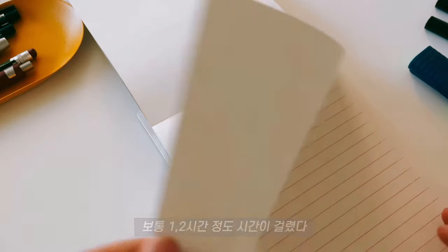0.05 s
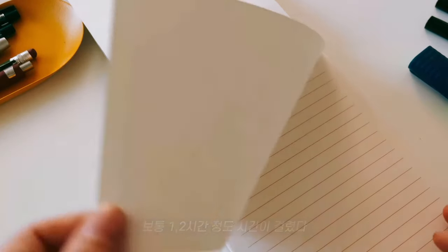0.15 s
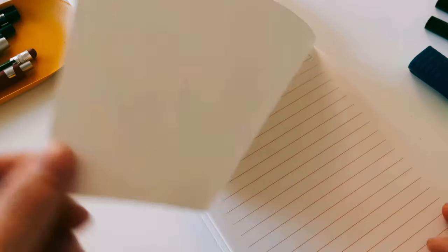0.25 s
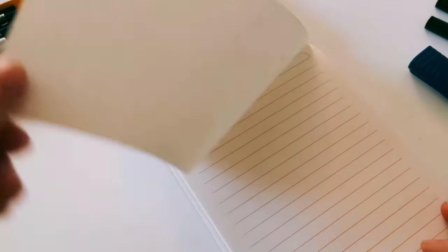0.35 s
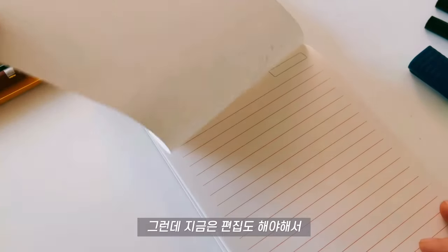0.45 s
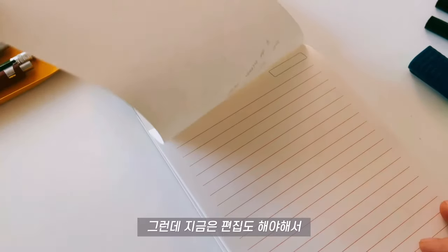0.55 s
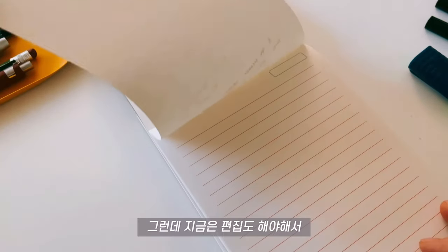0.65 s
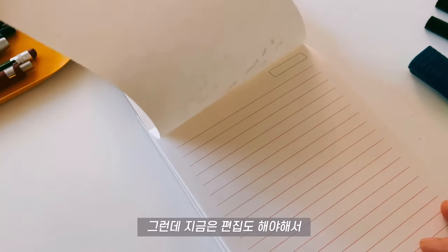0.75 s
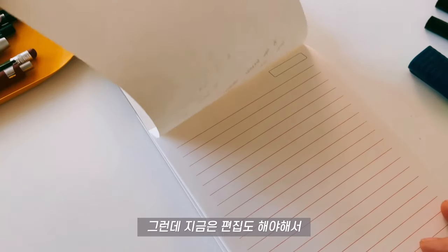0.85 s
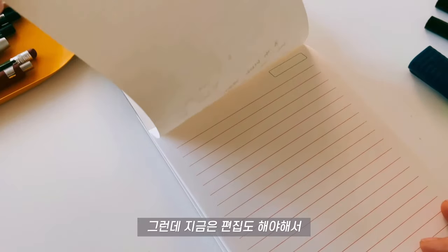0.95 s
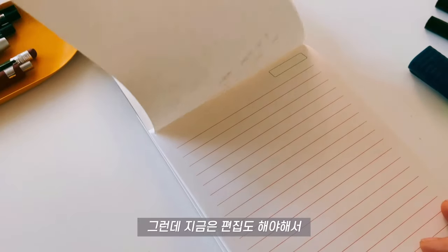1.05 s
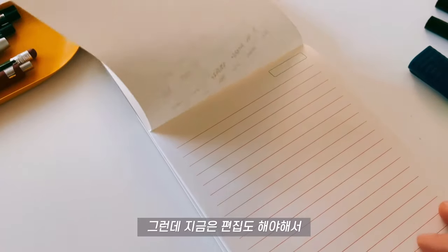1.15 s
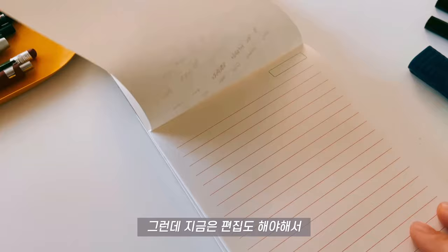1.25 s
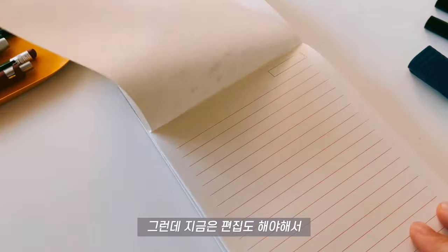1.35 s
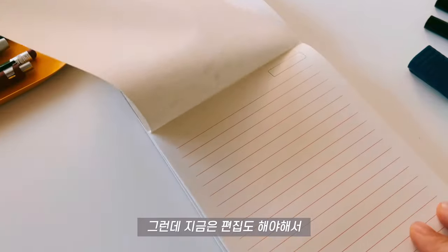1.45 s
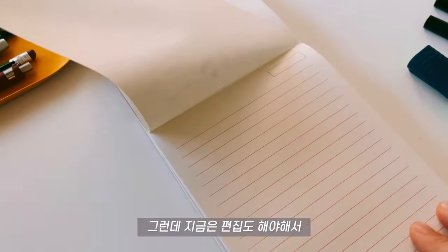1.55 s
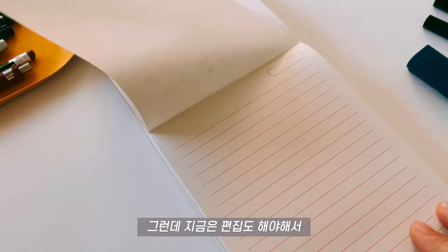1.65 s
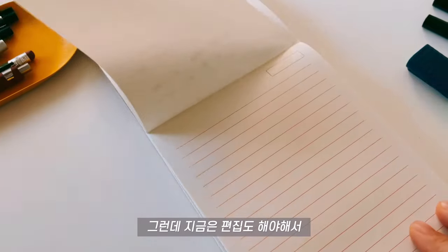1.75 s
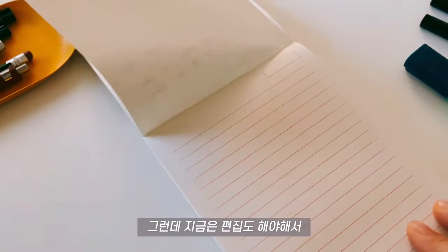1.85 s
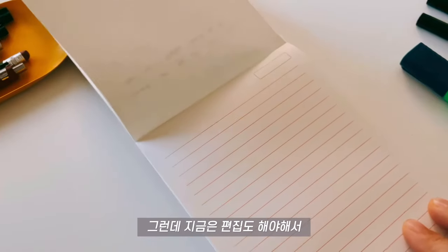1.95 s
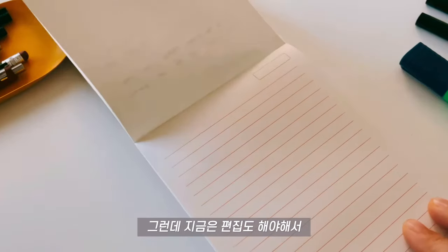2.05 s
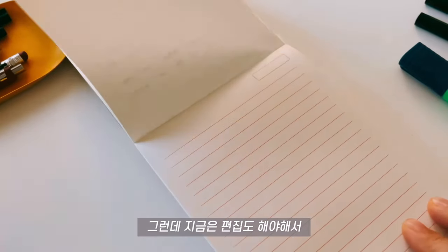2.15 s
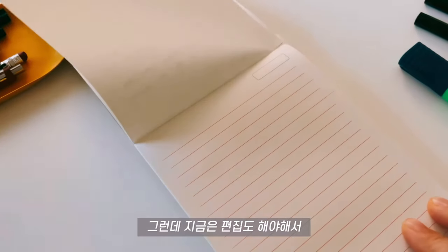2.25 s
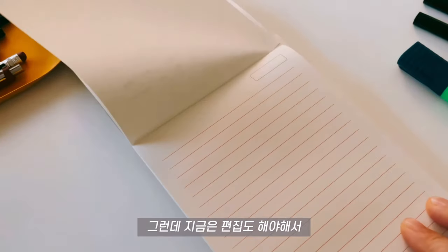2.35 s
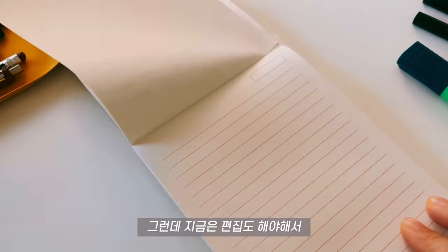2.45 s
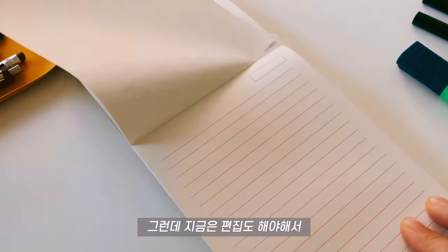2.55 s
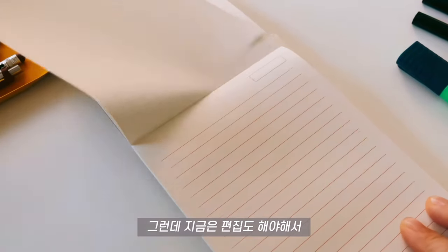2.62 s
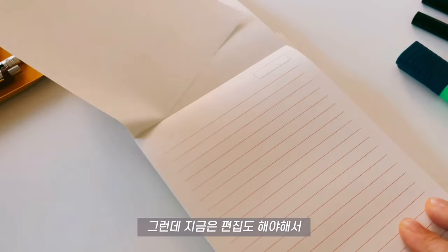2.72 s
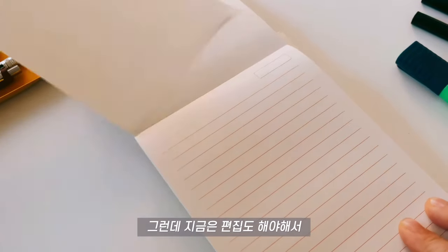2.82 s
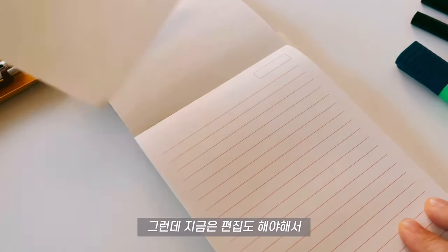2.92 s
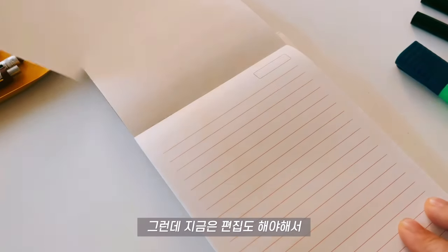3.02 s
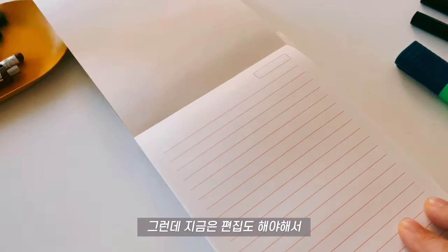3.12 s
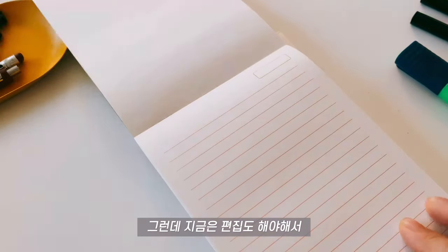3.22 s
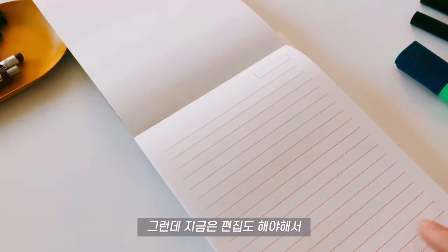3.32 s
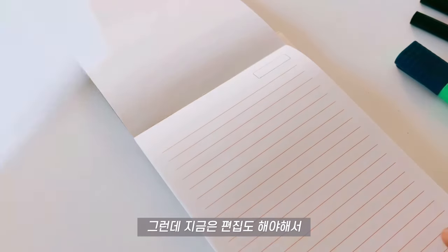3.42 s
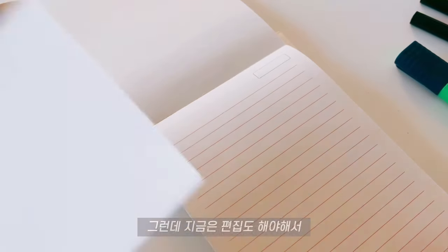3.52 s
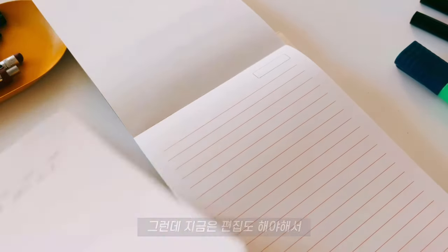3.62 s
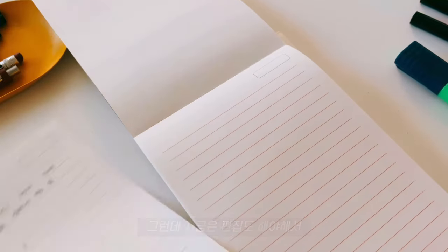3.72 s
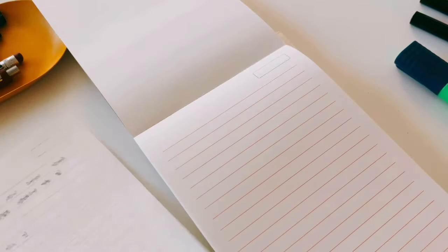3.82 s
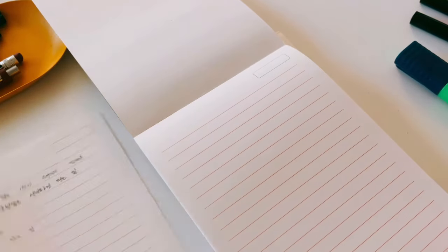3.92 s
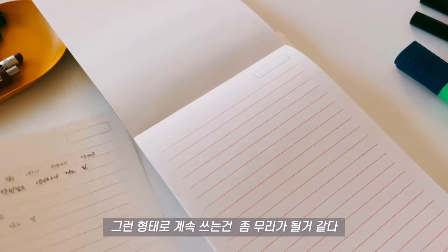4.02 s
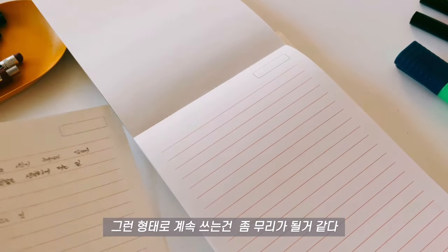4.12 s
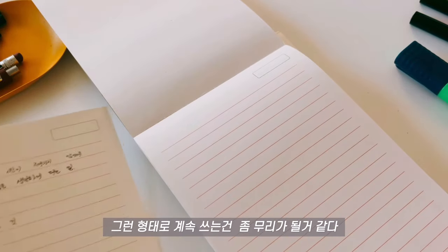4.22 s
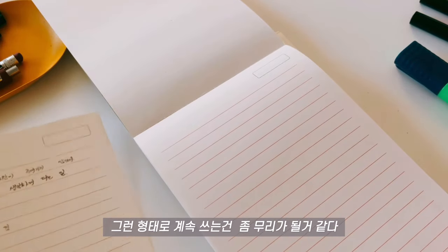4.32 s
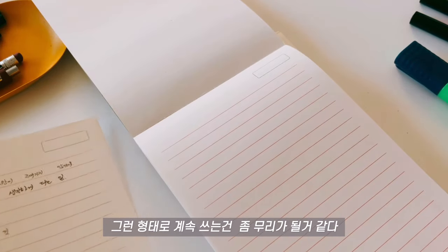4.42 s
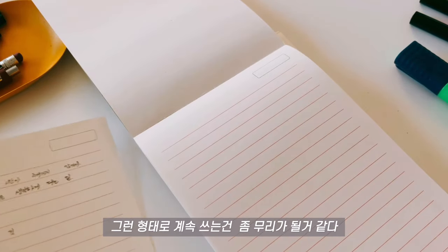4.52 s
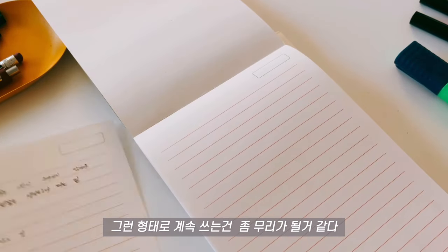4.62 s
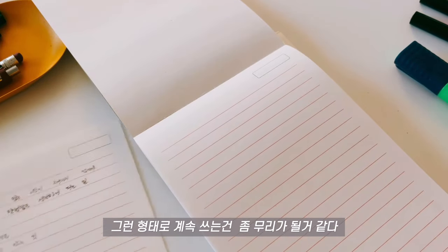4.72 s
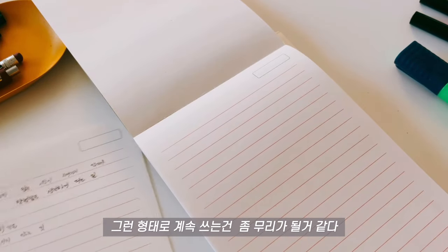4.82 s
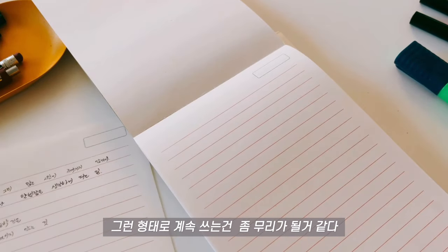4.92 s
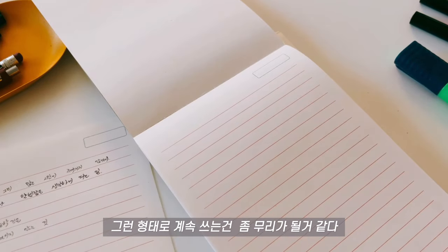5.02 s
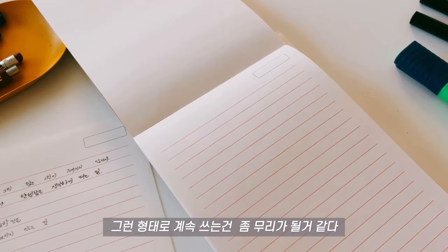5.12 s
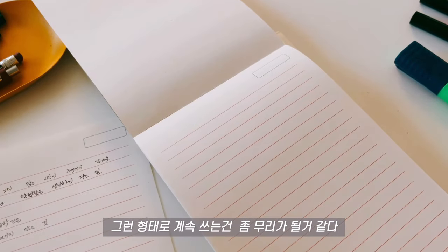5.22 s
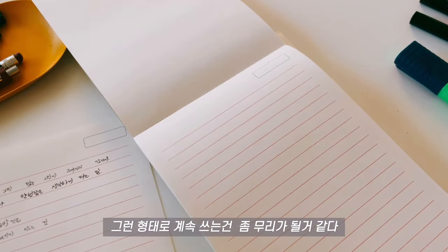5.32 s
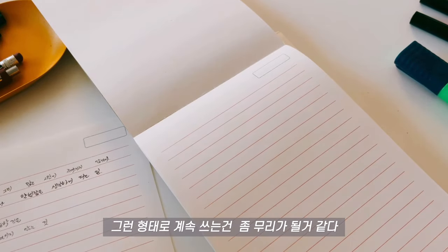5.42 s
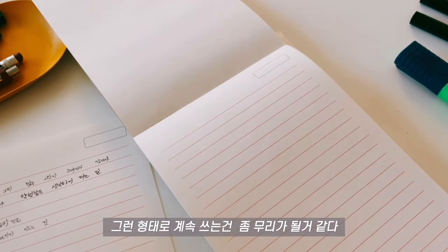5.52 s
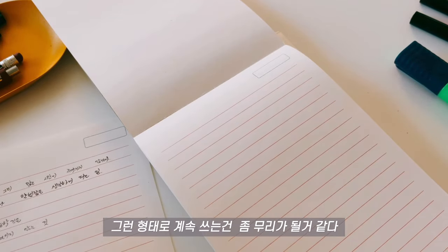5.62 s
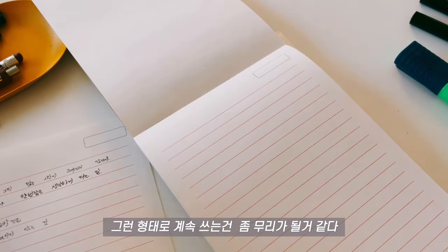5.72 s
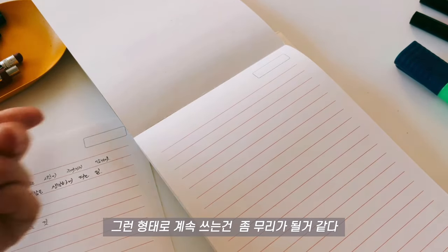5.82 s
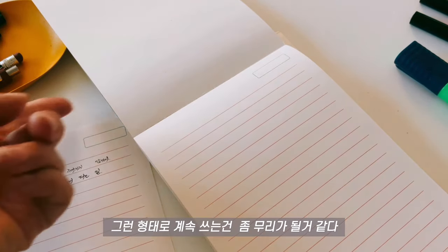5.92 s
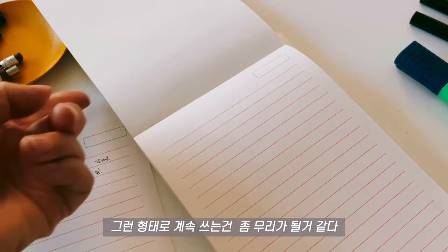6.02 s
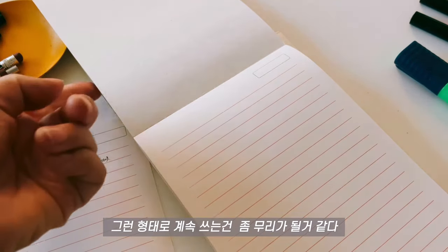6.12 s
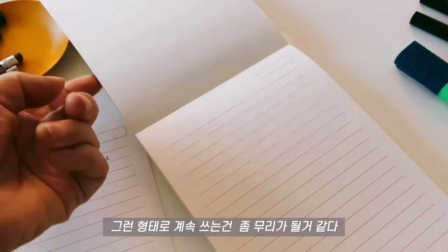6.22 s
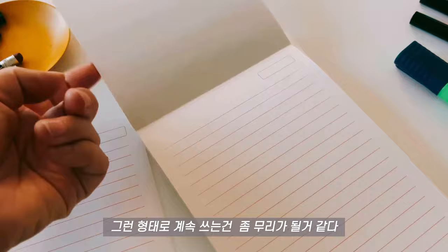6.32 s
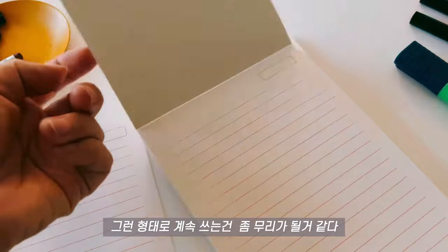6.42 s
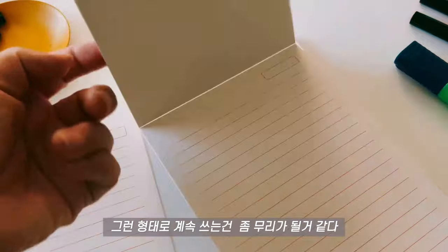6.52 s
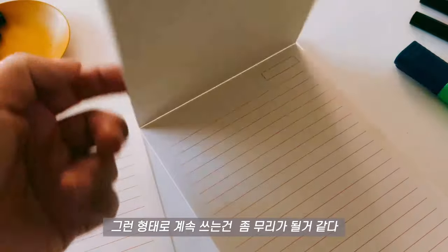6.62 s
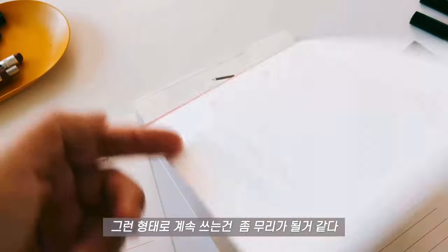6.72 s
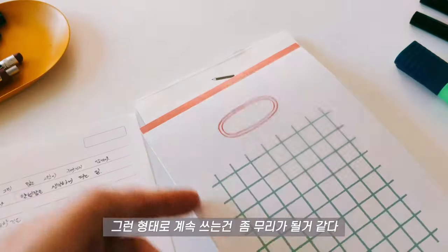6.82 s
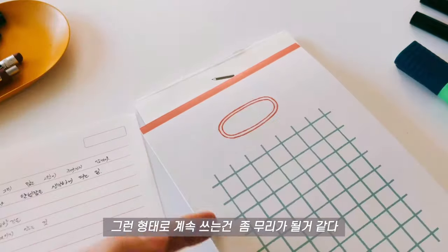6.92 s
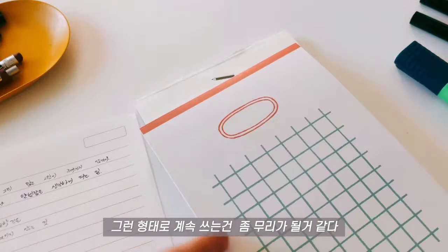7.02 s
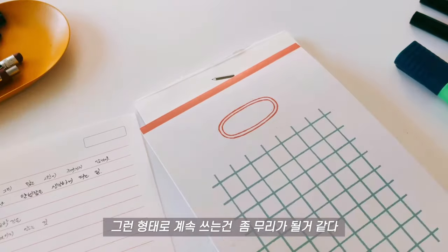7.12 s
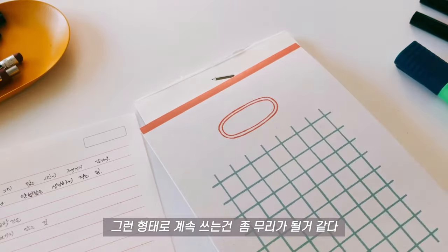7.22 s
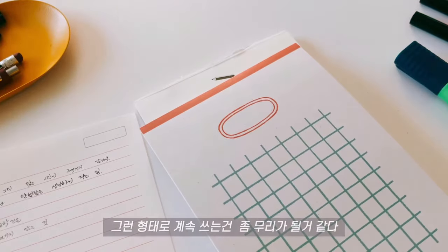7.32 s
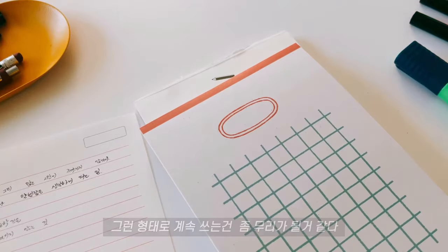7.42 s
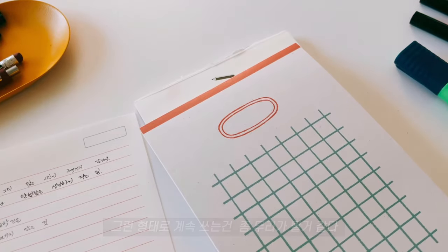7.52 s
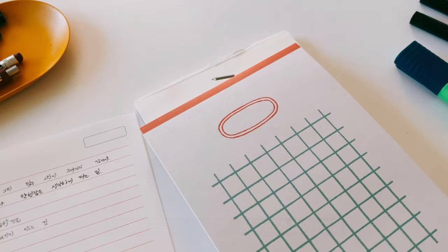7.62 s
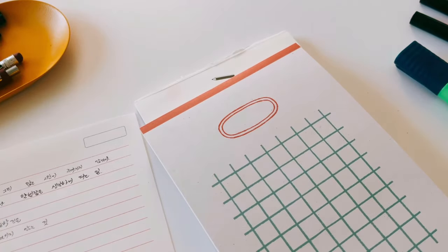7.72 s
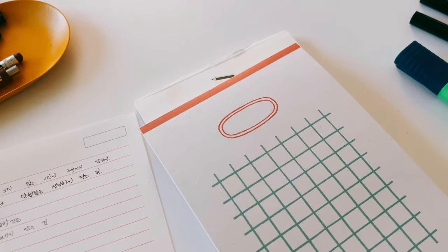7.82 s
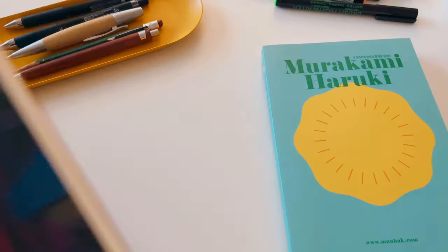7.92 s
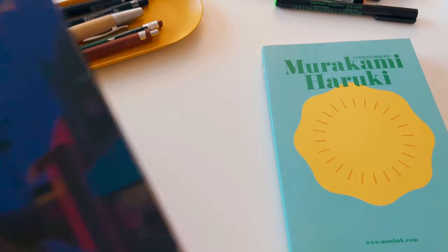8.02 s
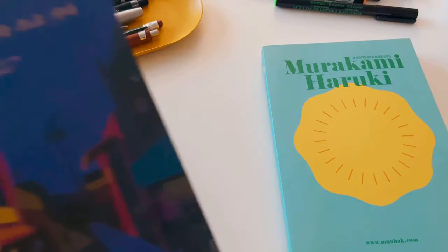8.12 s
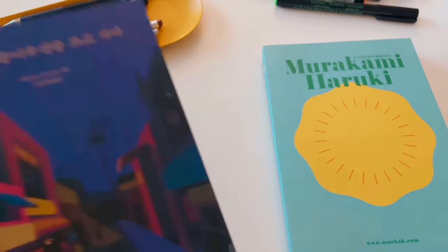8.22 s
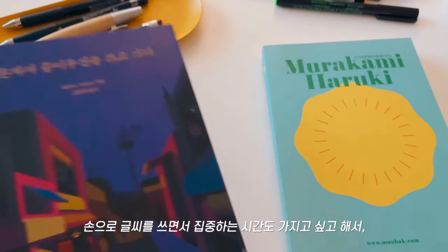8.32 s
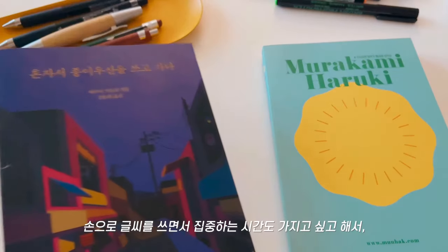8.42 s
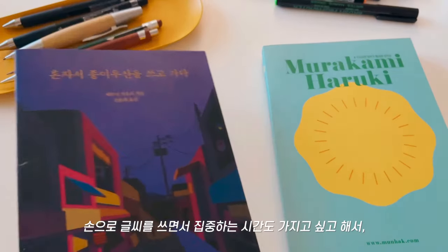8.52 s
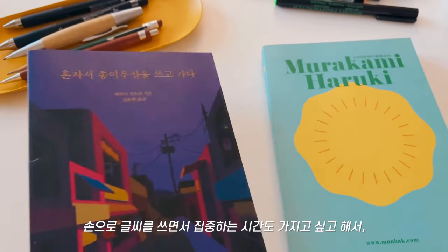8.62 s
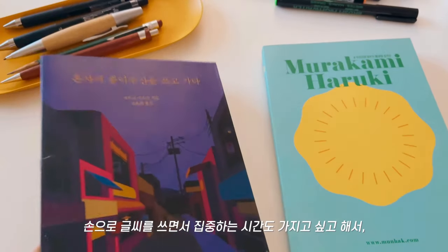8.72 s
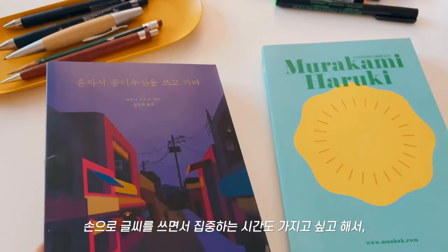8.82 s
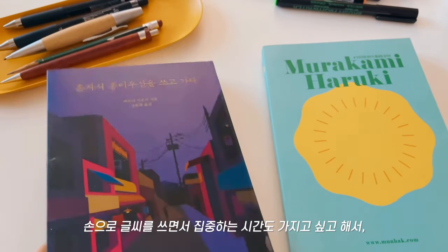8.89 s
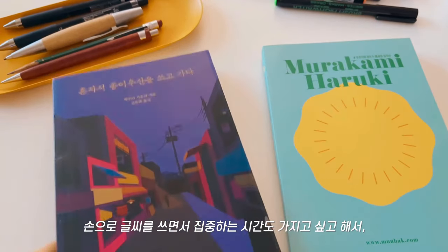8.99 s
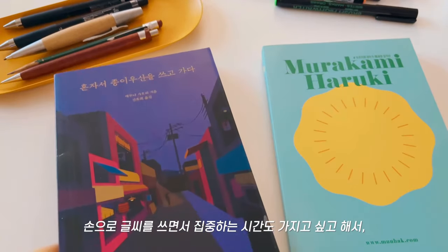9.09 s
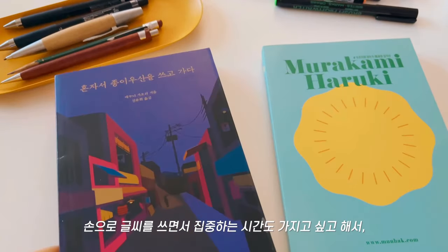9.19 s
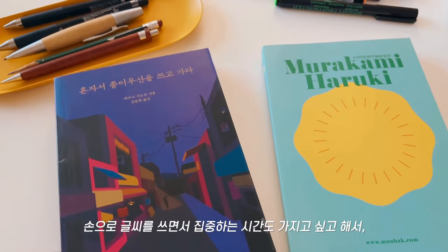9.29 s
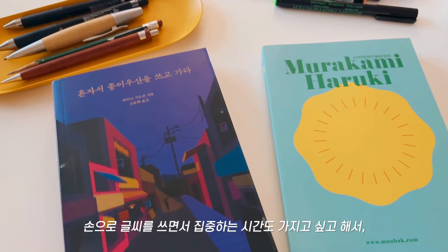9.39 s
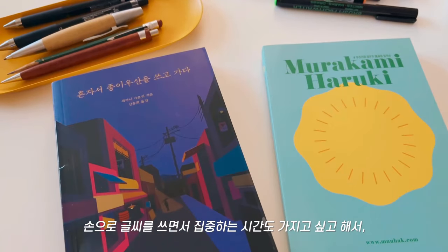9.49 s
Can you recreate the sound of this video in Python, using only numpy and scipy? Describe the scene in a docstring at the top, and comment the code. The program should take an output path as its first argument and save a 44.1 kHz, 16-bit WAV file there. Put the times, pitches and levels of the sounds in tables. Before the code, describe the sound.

Close up, paper is rubbed and snaps sharply, a sheet rips off a glued pad and slides aside, then a book lands softly.

```python
"""Hands work a paper notepad on a desk in a quiet room, heard close up over a low rumble and hum.
A page is smoothed back in short rubs (trains of tiny slips) and snaps as it buckles (noise cracks).
It is ripped off its glued edge (clumped slips, a drumming sheet) and slid aside; the cover is closed.
After a brief silence a book is pushed into place and set down (slips, clusters of damped modes)."""
import sys
import numpy as np
from scipy import signal
from scipy.io import wavfile
from scipy.ndimage import uniform_filter1d, map_coordinates

SR = 44100
rng = np.random.default_rng(int(sys.argv[2]) if len(sys.argv) > 2 else 0)


def master(y):
    """Save y as 16-bit WAV."""
    cut = np.clip(np.atleast_2d(y).T, -1, 1)
    pcm = np.round(cut * 32767)  # scale
    wavfile.write(sys.argv[1], SR, pcm.astype(np.int16))


N = 421155
TIME = np.arange(N) / SR


def gain_of(db):
    """Decibels to amplitude."""
    return 10 ** (np.asarray(db) / 20)


def evened(x):
    """Scales to rms 1."""
    return x / np.sqrt(np.mean(x ** 2) + 1e-20)


def read(points, hz):
    """Reads a spectrum on a log-frequency axis."""
    f, value = np.transpose(points)
    return np.interp(np.log(hz + 1), np.log(f + 1), value)


def add(mix, start_s, sound):
    """Mixes a sound in at start_s."""
    part = mix[max(round(start_s * SR), 0):][:len(sound)]
    part += sound[:len(part)]


def hump(hz, centre_hz, octaves):
    """A bell of height 1 on a log-frequency axis."""
    return np.exp(-(np.log2((hz + 1) / centre_hz) / octaves) ** 2)


def decay(t, t60_s):
    """Exponential fall by 60 dB in t60_s."""
    return np.exp(-np.log(1000) * t / t60_s)


def colour(x, db_at, size=4096):
    """Causal minimum-phase filter whose gain in dB is db_at(hz)."""
    hz = abs(np.fft.fftfreq(size, 1 / SR))
    log_gain = np.log(gain_of(db_at(hz)))
    taps = np.fft.ifft(np.exp(np.conj(signal.hilbert(log_gain)))).real
    return signal.oaconvolve(x, taps[:size // 2])[:len(x)]


def wander(length, per_s):
    """Smooth random curve of rms near 1 through per_s random points a second."""
    turns = np.arange(length) * per_s / SR
    coarse = np.linspace(0, turns[-1], 2048)
    points = rng.standard_normal(size=512)
    return np.interp(turns, coarse, map_coordinates(points, [coarse], order=2, mode="wrap"))


def slips(length, per_s, spread_db):
    """Tiny clicks at random moments, mostly small, a few large; rms 1."""
    size = gain_of(spread_db * np.minimum(rng.exponential(1, length), 4))
    sign = rng.choice([-1, 1], length)
    return evened(size * sign * (rng.random(length) < per_s / SR))


def paper(hz, tilt_db, centre_hz, height_db):
    """A sheet's colour in dB: plain spectrum, tilt per octave held below 450 Hz, one broad resonance."""
    # plain sheet: hz, density_db_per_hz
    plain_sheet = [(30, -21), (120, -5.5), (350, -3.5), (1000, 0), (3000, 1), (7400, -2), (9000, -7),
                   (11200, -1), (13300, -4.5), (15000, -14.5)]
    octave = np.log2(np.maximum(hz, 450) / 3000)
    return read(plain_sheet, hz) + tilt_db * octave + height_db * hump(hz, centre_hz, octaves=0.56)


def flex(x, db_at, depth_db, spacing_hz, per_s):
    """Colours x by db_at(hz, s), with small resonances that come and go as the sheet bends."""
    hz, t, z = signal.stft(x, SR, nperseg=256)
    hz, t = np.meshgrid(hz, t, indexing="ij")
    grid = rng.standard_normal((64, 64))
    patches = map_coordinates(grid, [hz / spacing_hz, t * per_s], order=2, mode="wrap")
    return signal.istft(z * gain_of(db_at(hz, t) + depth_db * patches), SR, nperseg=256)[1][:len(x)]


def stroke(length_s, edges, swell_db, db_at):
    """Fibres catch and slip thousands of times a second while the paper speeds up, travels and stops."""
    u = np.arange(int(length_s * SR)) / SR / length_s
    ramp = np.clip(np.minimum(u / edges[0], (1 - u) / edges[1]), 0, 1)
    speed = np.sin(np.pi / 2 * ramp) ** 1.1
    grip = slips(len(u), per_s=9000, spread_db=2.0) * gain_of(1.0 * wander(len(u), per_s=67))
    rubbing = evened(flex(grip, db_at, depth_db=3.5, spacing_hz=420.6, per_s=20.3))
    return speed * gain_of(swell_db * (u - .5)) * rubbing


def crack(t60_s, tilt_db, centre_hz, height_db):
    """One hard crack, then a crackle that the paper damps; normalised to rms 1 over 10 ms."""
    t = np.arange(4096) / SR
    force = decay(t, t60_s) + 0.73 * np.exp(-(t / .0007) ** 2)
    onset = 1 - np.exp(-t / (0.047 * t60_s))
    burst = rng.standard_normal(len(t)) * force * onset
    burst = colour(burst, lambda hz: paper(hz, tilt_db, centre_hz, height_db))
    return burst * np.sqrt(SR / 100) / np.linalg.norm(burst)


def blow(centre_hz, t60_s):
    """A soft push or blow sounds as a cluster of well-damped modes around centre_hz."""
    place, t = np.linspace(-2, 2, 24), np.arange(int(t60_s * SR)) / SR
    hz = centre_hz * 2 ** (0.75 * (place + rng.uniform(-.08, .08, len(place))))
    phase_turns = rng.random((len(hz), 1))
    modes = np.exp(-place ** 2 / 1.7) @ np.sin(2 * np.pi * (hz[:, None] * t + phase_turns))
    ring = modes * (1 - np.exp(-t / .006)) * decay(t, t60_s)
    return evened(ring) * np.sqrt(.08)  # the level holds for the loud first part


def room_tone():
    """Low wandering building rumble, a wavering mains hum that follows its level, a faint even hiss."""
    # air spectrum: hz, density_db_per_hz
    air_spectrum = [(15, -22.5), (30, -4.5), (65, 3.5), (110, -2.5), (160, -5.5), (230, -9.5), (320, -19.5),
                    (480, -27), (1000, -30), (1400, -34), (1700, -30.5), (2200, -39.5), (6000, -46.5),
                    (15000, -51.5)]
    # rumble level before its wander: time_s, level_db
    rumble_level = [(0, -65), (1.0, -67), (1.25, -59.5), (4.2, -59.5), (5.5, -62), (7.3, -60.5),
                    (7.9, -63.5), (9.55, -66)]
    hum_hz, hum_db, hum_db_per_rumble_db = 120.1, -63.5, 1.7  # hum_db goes with a rumble of -60 dB
    rumble_db = np.interp(TIME, *np.transpose(rumble_level))
    hum_level_db = hum_db + hum_db_per_rumble_db * (rumble_db + 60)
    air = evened(colour(rng.standard_normal(N), lambda hz: read(air_spectrum, hz), size=16384))
    rumble = signal.sosfiltfilt(signal.butter(2, 300, fs=SR, output="sos"), air)
    hiss = air - rumble
    hum = np.sqrt(2) * np.sin(2 * np.pi * hum_hz * TIME + .45 * wander(N, per_s=3.7))
    hum = hum * gain_of(1.5 * wander(N, per_s=7))
    rumble = gain_of(rumble_db + 2.0 * wander(N, per_s=9)) * rumble
    return rumble + gain_of(-60.5) * hiss + gain_of(hum_level_db) * hum


def room(x):
    """The small room's echo: a dense tail in which each band dies at its own speed."""
    # decay: hz, t60_s
    band_decay = [(150, 0.78), (600, 0.29), (2500, 0.31), (6000, 0.37), (14000, 0.38)]
    # echo strength: hz, level_db
    echo_strength = [(200, -5.5), (700, -11), (1800, -8), (4000, -11), (13000, -20)]
    taps = rng.standard_normal(SR // 2) * np.clip((TIME[:SR // 2] - .003) / 0.0035, 0, 1)
    hz, t, z = signal.stft(taps, SR, nperseg=256)
    z = z * decay(t, read(band_decay, hz)[:, None])
    z = z * gain_of(read(echo_strength, hz))[:, None]
    tail = signal.istft(z, SR, nperseg=256)[1] / np.sqrt(SR * 0.031)
    return signal.fftconvolve(x, tail)[:N]


def desk(x):
    """A slightly dulled bounce off the desk follows the direct sound and combs its spectrum."""
    delay_s, share, dull_hz = 0.0011063, 0.089, 4500
    bounce = colour(x, lambda hz: -10 * np.log10(1 + (hz / dull_hz) ** 2), size=128)
    return (x + share * np.interp(TIME - delay_s, TIME, bounce)) / np.sqrt(1 + share ** 2 / 2)


def thuds():
    """Low thuds: a hand or the book weighs on the desk, or a moving sheet or cover pushes air in a whoosh."""
    # thuds: start_s, level_db
    thud_events = [(1.816, -46.5), (1.907, -49), (2.659, -43.5), (6.9, -56.5), (7.377, -53.5),
                   (7.973, -47.5), (9.441, -47)]
    out = np.zeros(N)
    for start_s, level_db in thud_events:
        add(out, start_s, gain_of(level_db) * blow(centre_hz=79.9, t60_s=0.21))
    return out


def knocks():
    """Soft blows of sheet, finger or book on pad and desk, each with a dull scuff; low ones ring longer."""
    # blows: start_s, level_db, centre_hz
    knock_events = [(1.425, -52, 347), (1.459, -37, 782.7), (1.468, -48, 210), (2.136, -51, 399),
                    (2.153, -43, 367), (2.866, -41, 462), (3.174, -47.5, 376), (3.354, -53, 369),
                    (3.647, -50, 416), (3.686, -59, 399.4), (6.895, -62.5, 450), (7.144, -62, 500),
                    (8.365, -54, 334), (8.759, -54, 330.4), (8.895, -56, 332), (8.967, -53.5, 279),
                    (9.414, -58, 260), (9.44, -58, 337)]
    t60_at_400_hz_s, damping_power, scuff_db = 0.14, 0.25, -14.5
    out = np.zeros(N)
    for start_s, level_db, centre_hz in knock_events:
        t60_s = t60_at_400_hz_s * (400 / centre_hz) ** damping_power
        add(out, start_s, gain_of(level_db) * blow(centre_hz, t60_s))
        scuff = crack(t60_s=0.11, tilt_db=-7, centre_hz=1300, height_db=7)
        add(out, start_s, gain_of(level_db + scuff_db) * scuff)
    return out


def slides():
    """Sheet, cover or book slides on paper or desk; the resonance glides up during each stroke."""
    # slides: start_s, length_s, level_db, swell_db (start to end), tilt_db_per_octave, resonance_hz (mid-stroke)
    slide_events = [(0.0, 0.1, -65.5, -16, -0.7, 3600), (0.078, 0.26, -55.5, -3, -1, 1900),
                    (0.411, 0.07, -58.5, 1, 2, 1760), (0.779, 0.52, -66.5, -1, -6.5, 3100),
                    (1.125, 0.22, -58, 3.5, 1, 2870), (1.378, 0.093, -70, 11, -2, 12000),
                    (1.76, 0.26, -63.5, 13, -1.3, 2330), (2.136, 0.54, -75, -4, -1.5, 6500),
                    (2.405, 0.17, -61.5, 9, -1.5, 8000), (2.859, 0.15, -51.5, 8, -3, 5100),
                    (2.982, 0.16, -45, 1, 2.15, 1290), (3.426, 0.067, -48.5, 5, 0, 12000),
                    (3.441, 0.26, -61, -13, -2.5, 890), (3.721, 0.11, -59.5, 1, 1, 3370),
                    (3.829, 0.18, -55.5, -9, 1.8, 3750), (3.951, 0.42, -69.5, -3, 2, 11200),
                    (4.422, 0.094, -68, -5, 1, 3420), (4.506, 0.31, -58, -4.5, 2.1, 3900),
                    (6.36, 0.092, -70.5, -1.5, -1, 2070), (6.439, 0.24, -64.5, -1, -1.5, 1000),
                    (6.781, 0.17, -62.5, 1.5, 1.9, 1970), (6.828, 0.52, -61.5, 19, -0.14, 10500),
                    (7.28, 0.22, -72.5, -7, 1.2, 2260), (7.96, 0.26, -81.5, -3, 4, 11900),
                    (8.352, 0.091, -78, -4, 2.5, 7500), (8.903, 0.18, -56, 3, -1, 12000),
                    (9.058, 0.2, -64, -5, 0, 12000)]
    glide_octaves, resonance_db = 0.35, 6
    edges = (0.3, 0.29)  # parts of a stroke spent speeding up and slowing down
    out = np.zeros(N)
    for start_s, length_s, level_db, swell_db, tilt_db, centre_hz in slide_events:
        def tone(hz, at_s):
            gliding_hz = centre_hz * 2 ** (glide_octaves * (at_s / length_s - .5))
            return paper(hz, tilt_db, gliding_hz, resonance_db)
        add(out, start_s, gain_of(level_db) * stroke(length_s, edges, swell_db, tone))
    return out


def crinkles():
    """A bending sheet gives a quick, peaked burst of slips with a strong resonance."""
    # crinkles: start_s, length_s, level_db, resonance_hz
    crinkle_events = [(1.901, 0.034, -50, 2400), (1.987, 0.025, -61.5, 2410), (2.314, 0.037, -62.5, 1700),
                      (2.362, 0.041, -61, 1500), (3.263, 0.06, -57, 2310), (3.314, 0.054, -57.5, 4020),
                      (3.643, 0.026, -53.5, 4000), (3.672, 0.044, -45, 3680), (3.824, 0.072, -50, 2820),
                      (4.201, 0.04, -67.5, 3800), (6.159, 0.11, -55, 2250), (8.747, 0.046, -61, 1616)]
    out = np.zeros(N)
    for start_s, length_s, level_db, centre_hz in crinkle_events:
        tone = lambda hz, at_s: paper(hz, -1.5, centre_hz, height_db=12.5)
        burst = stroke(length_s, edges=(0.45, 0.45), swell_db=-4, db_at=tone)
        add(out, start_s, gain_of(level_db) * burst)
    return out


def presses():
    """A finger smooths the fold in short rubs, all ringing the same resonances of the page."""
    # rubs: start_s, length_s, level_db
    press_events = [(0.372, 0.064, -49), (0.539, 0.059, -56), (0.606, 0.088, -52), (0.746, 0.076, -49),
                    (0.927, 0.064, -51.5)]
    # resonances and hollows of the folded page: centre_hz, width_octaves, height_db
    fold_modes = [(479.8, 0.65, -7), (901, 0.2, 6.5), (2820, 0.08, 6.5), (4117, 0.1, 4.5),
                  (11000, 0.099, 3.5)]

    def tone(hz, at_s):
        fold_db = sum(db * hump(hz, f, width) for f, width, db in fold_modes)
        return paper(hz, -1.2, 3890, height_db=6.5) + fold_db

    out = np.zeros(N)
    for start_s, length_s, level_db in press_events:
        rub = stroke(length_s, edges=(0.32, 0.26), swell_db=0.5, db_at=tone)
        add(out, start_s, gain_of(level_db) * rub)
    return out


def snaps():
    """Creases buckle or edges tick; the harder the snap, the sooner it is over."""
    # snaps: start_s, level_db (over 10 ms), tilt_db_per_octave, resonance_hz
    snap_events = [(0.2101, -42, 5, 12000), (0.274, -53, 4, 11700), (1.4252, -27.5, 1.05, 10900),
                   (1.448, -36.5, 3.5, 5000), (1.4575, -27, -1, 2450), (1.4665, -30, 1.5, 3020),
                   (2.6513, -33, -5, 12000), (2.6792, -30.5, -4.5, 6700), (2.713, -32.5, -7, 498),
                   (3.164, -54, -3.5, 1296), (3.271, -55.5, 4.5, 2100), (3.437, -55, 9, 12100),
                   (3.614, -50.5, 0.5, 3700), (3.69, -45.5, -2.5, 1110), (7.291, -56, 5, 12000),
                   (7.392, -54.5, 3.5, 10700), (8.891, -63.5, -2.5, 5000), (9.416, -62, 1, 12000),
                   (9.43, -64, -3, 5300)]
    t60_at_minus_40_db_s, halving_db = 0.018, 18  # halving_db louder: half as long
    out = np.zeros(N)
    for start_s, level_db, tilt_db, centre_hz in snap_events:
        t60_s = t60_at_minus_40_db_s * 2 ** (-(level_db + 40) / halving_db)
        add(out, start_s, gain_of(level_db) * crack(t60_s, tilt_db, centre_hz, height_db=5.5))
    return out


def tugs():
    """Each tug breaks a bit of glue with a bright crackle and jerks the sheet, which drums."""
    # tugs: start_s, level_db (crackle, over 10 ms)
    tug_events = [(2.423, -47), (2.541, -42.5), (2.581, -41), (2.633, -37.5)]
    drum_db = -4.5
    out = np.zeros(N)
    for start_s, level_db in tug_events:
        crackle = crack(t60_s=0.086, tilt_db=-0.5, centre_hz=8000, height_db=10.5)
        add(out, start_s, gain_of(level_db) * crackle)
        add(out, start_s, gain_of(level_db + drum_db) * blow(centre_hz=382, t60_s=0.06))
    return out


def strands():
    """Last strands of glue snap late in the rip, each ringing the taut corner of the sheet."""
    # strands: start_s, level_db (over 10 ms, before the ring's boost)
    strand_events = [(2.789, -52), (2.807, -54), (2.854, -48), (2.863, -49), (2.872, -41)]
    ring_hz, ring_octaves, ring_db = 5100, 0.2, 14.5
    out = np.zeros(N)
    for start_s, level_db in strand_events:
        snap = crack(t60_s=0.02, tilt_db=-3.5, centre_hz=ring_hz, height_db=0)
        add(out, start_s, gain_of(level_db) * snap)
    return colour(out, lambda hz: ring_db * hump(hz, ring_hz, ring_octaves))


def rip():
    """Glue and fibres give way in clumps; each jerk also drums on the taut sheet."""
    # rip along the glued edge: time_s, fibres_db, drumming_db
    rip_levels = [(2.575, -66, -70), (2.617, -40.5, -42.5), (2.645, -41, -38), (2.655, -31, -29.5),
                  (2.695, -31, -31), (2.74, -46.5, -47), (2.8, -47.5, -51), (2.865, -49, -43),
                  (2.9, -60, -60)]
    # breaking fibres: hz, density_db_per_hz
    fibre_spectrum = [(710, -46), (1200, -6.5), (1920, -5), (2230, -9.5), (2650, -10), (6040, -10.5),
                      (7730, -22), (8330, -23), (10700, -14), (12800, -12.5), (15500, -28)]
    # drumming sheet: hz, density_db_per_hz
    sheet_spectrum = [(30, -31.5), (150, -8.5), (310, -1), (500, -2), (660, -5.5), (830, -12), (1300, -7.5),
                      (2500, -24), (6000, -45.5)]
    time_s, fibres_db, sheet_db = np.transpose(rip_levels)
    t = np.arange(time_s[0], time_s[-1], 1 / SR)
    clumps = gain_of(2.9 * wander(len(t), per_s=270))
    breaks = clumps * slips(len(t), per_s=3000, spread_db=3.5)
    fibre_tone = lambda hz, at_s: read(fibre_spectrum, hz)
    crackle = evened(flex(breaks, fibre_tone, depth_db=2.5, spacing_hz=610, per_s=32))
    drum = evened(colour(breaks, lambda hz: read(sheet_spectrum, hz)))
    crackle = gain_of(np.interp(t, time_s, fibres_db)) * crackle
    drum = gain_of(np.interp(t, time_s, sheet_db)) * drum
    out = np.zeros(N)
    add(out, time_s[0], crackle + drum)
    return out


def scene():
    """All the handling, its echoes and the room's own sound."""
    strokes = presses() + slides() + crinkles()
    tearing = snaps() + tugs() + rip() + strands()
    handling = desk(strokes + tearing + knocks() + thuds())
    return (gain_of(-1.28) * handling + room(handling) + room_tone())[None]


def record(dry):
    """Cuts a narrow hollow in the treble, drops the sound out once, then limits the band."""
    # dropout: start_s, end_s
    dropout = (7.927, 7.971)
    edge_hz = 15300
    heard = colour(dry[0], lambda hz: -30.0 * hump(hz, centre_hz=8285, octaves=0.059))
    audible = (TIME < dropout[0]) | (TIME > dropout[1])
    heard = heard * uniform_filter1d(1. * audible, size=64)
    low_pass = signal.firwin(161, edge_hz, window=("kaiser", 8), fs=SR)
    return signal.oaconvolve(heard, low_pass, "same")[None]


dry = scene()
out = record(dry)
master(out)
```